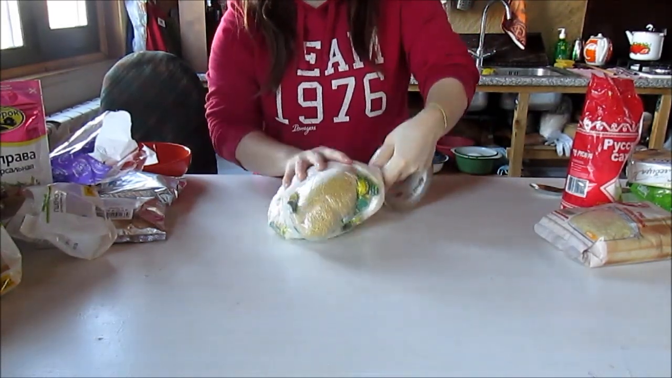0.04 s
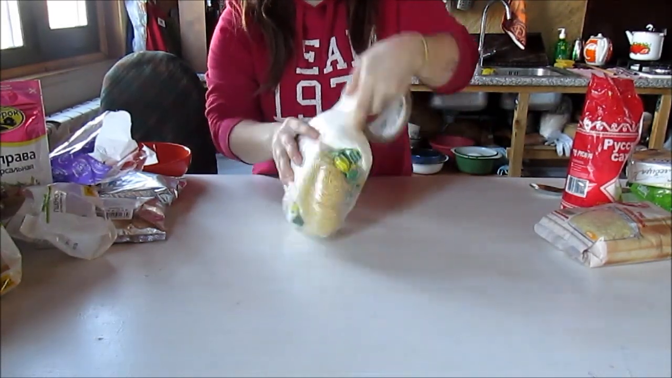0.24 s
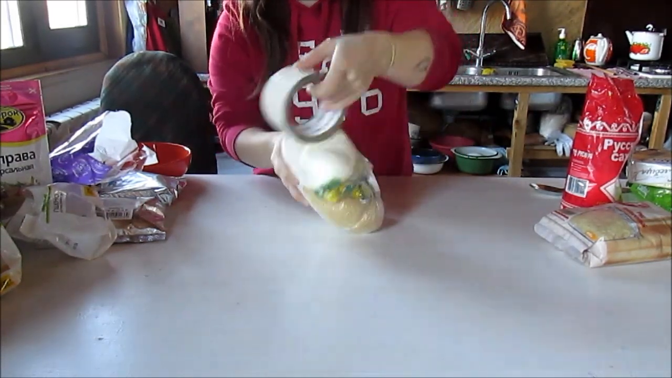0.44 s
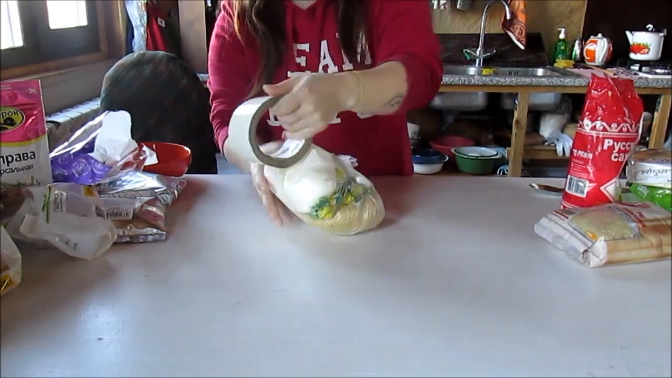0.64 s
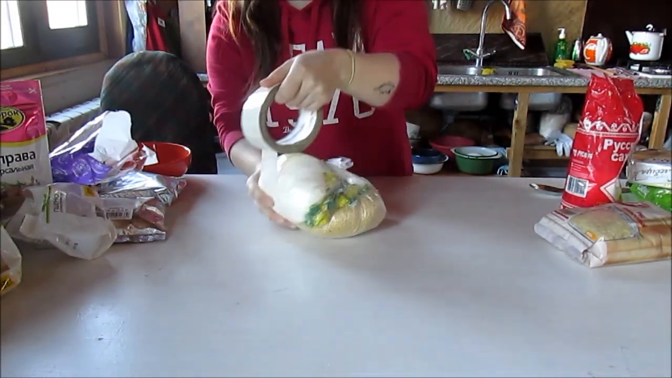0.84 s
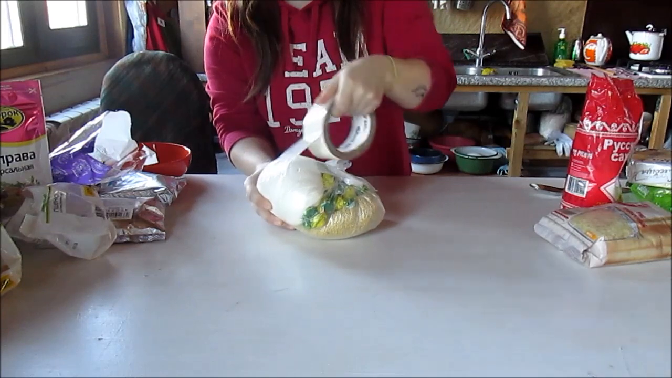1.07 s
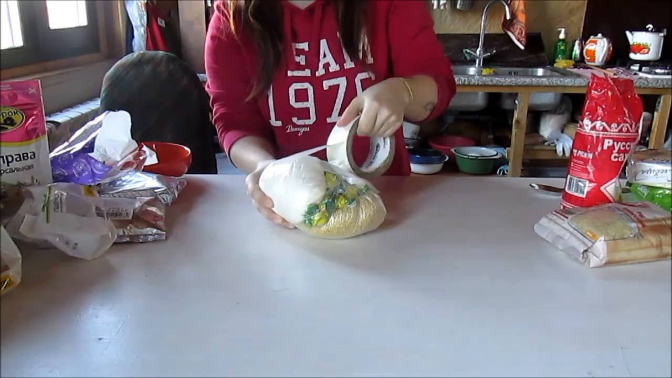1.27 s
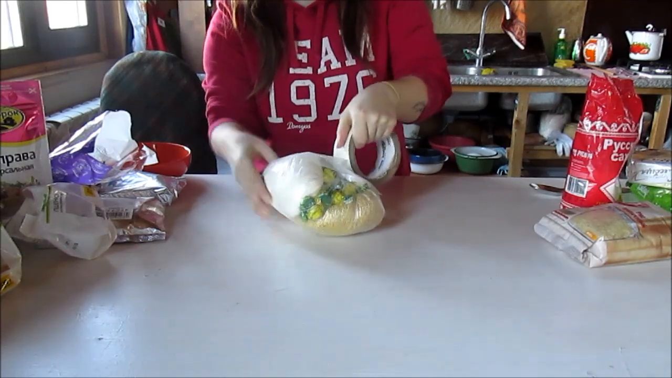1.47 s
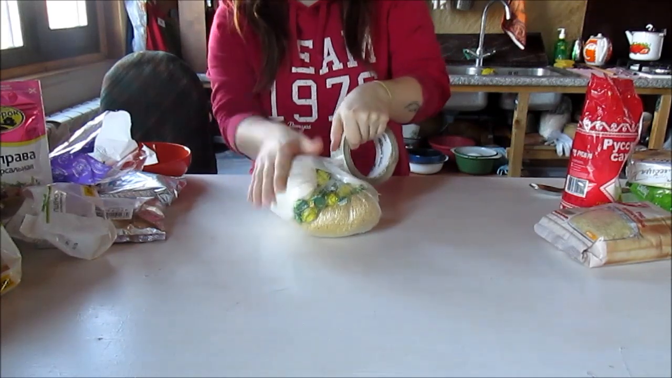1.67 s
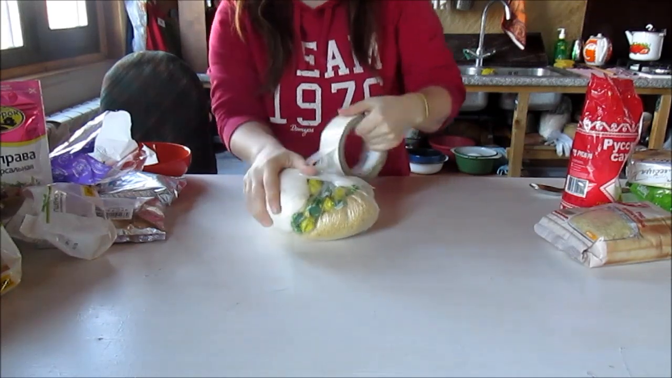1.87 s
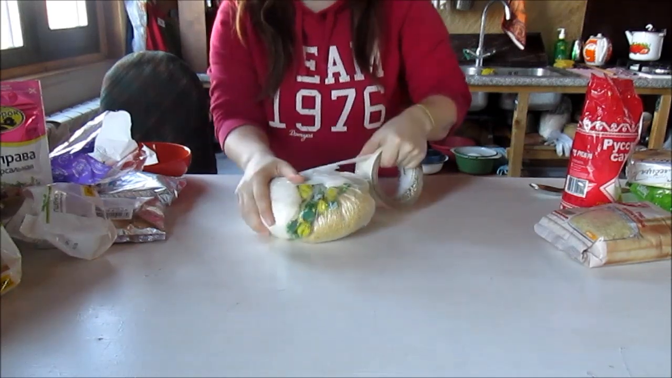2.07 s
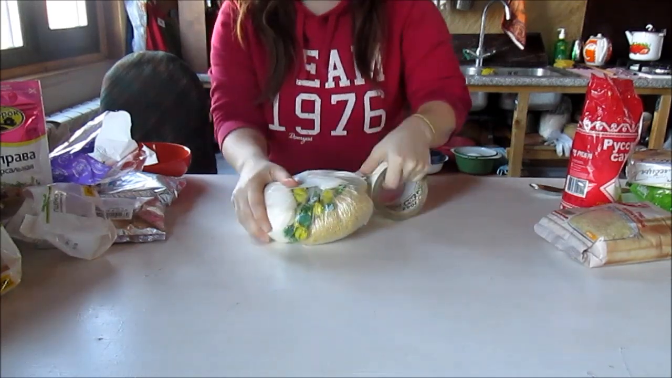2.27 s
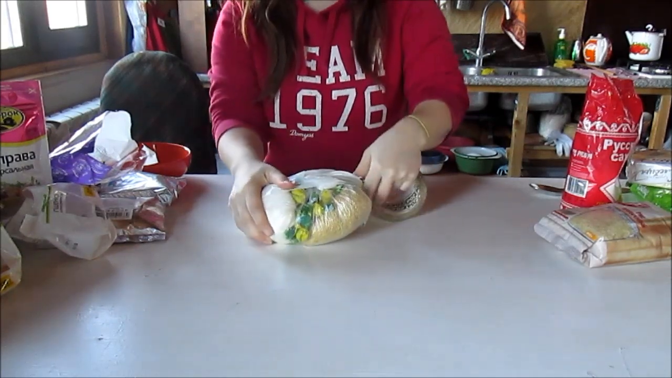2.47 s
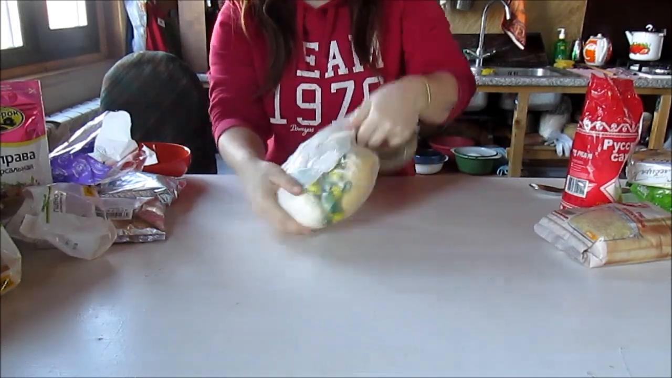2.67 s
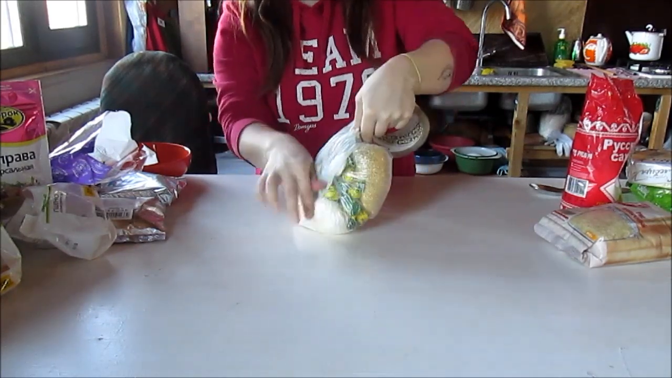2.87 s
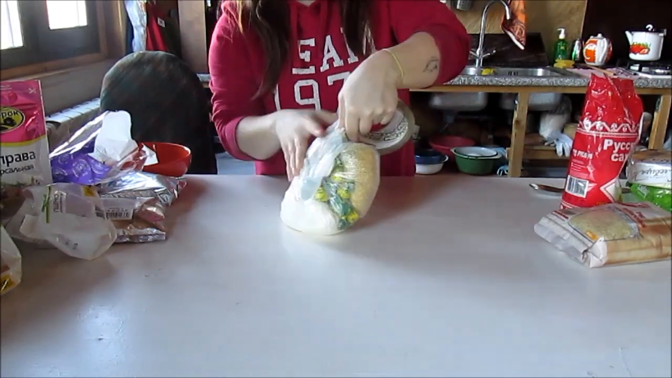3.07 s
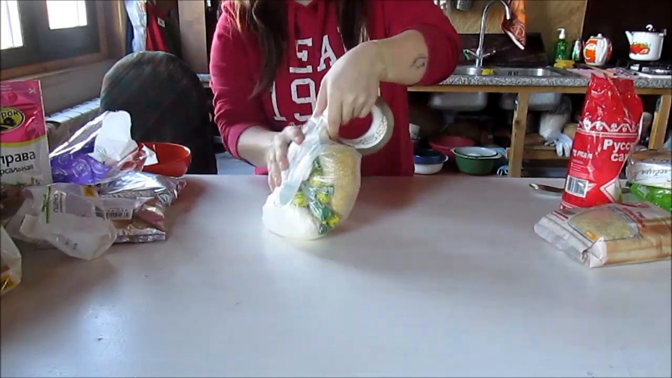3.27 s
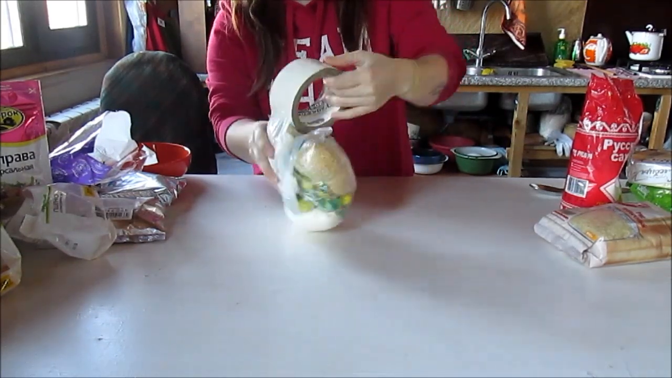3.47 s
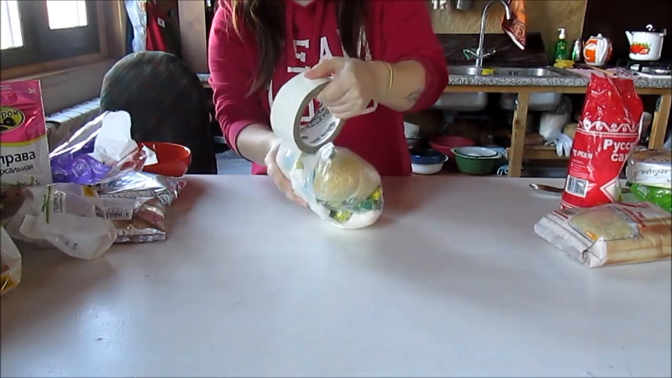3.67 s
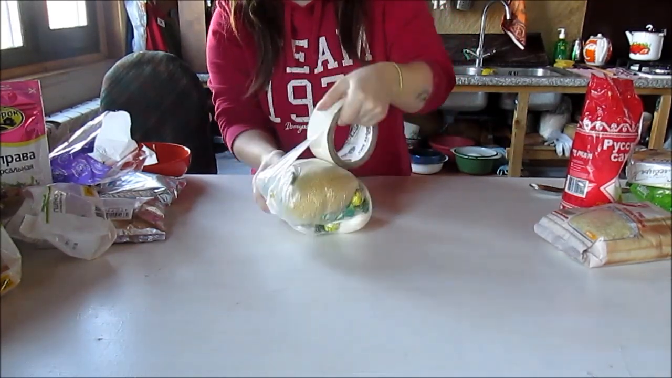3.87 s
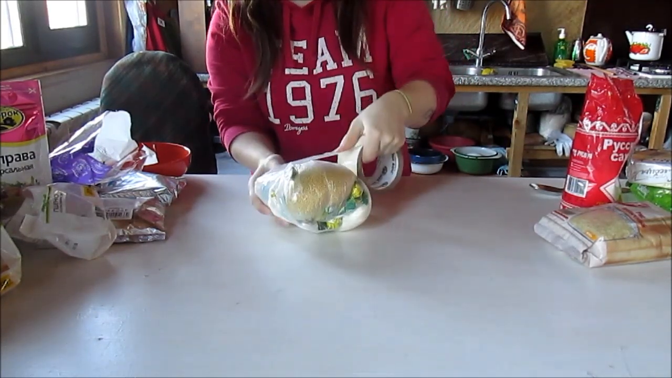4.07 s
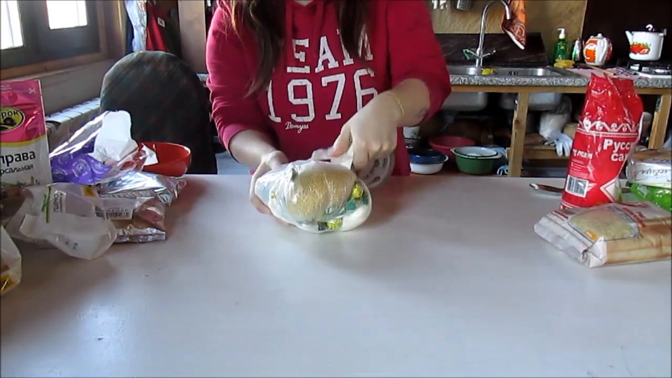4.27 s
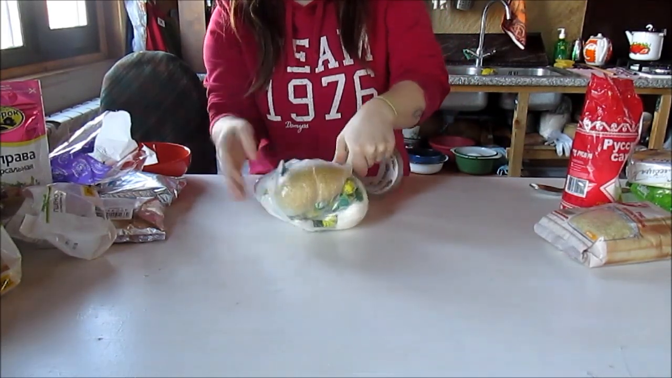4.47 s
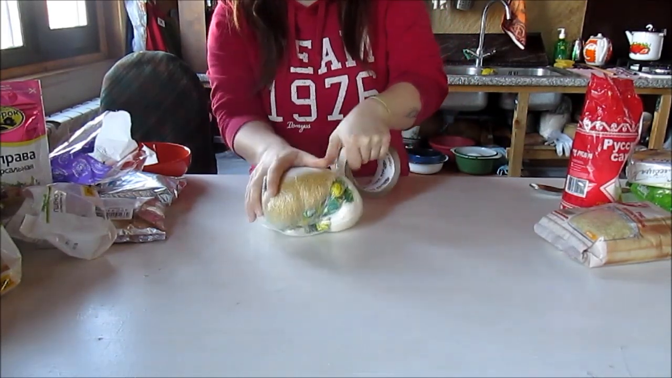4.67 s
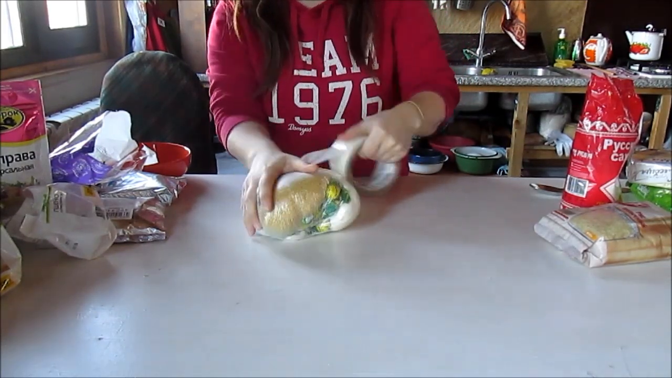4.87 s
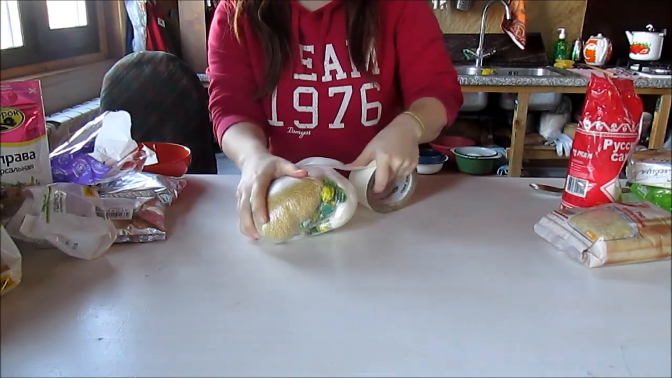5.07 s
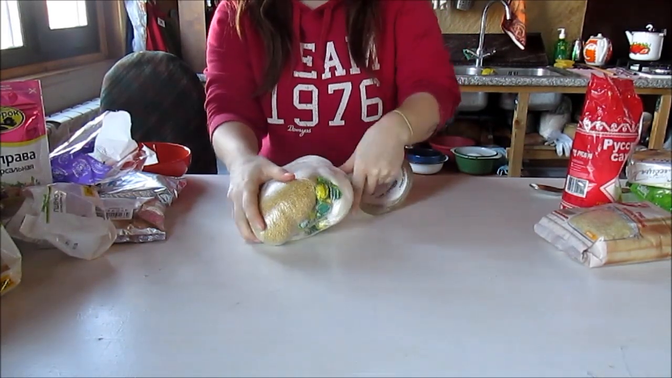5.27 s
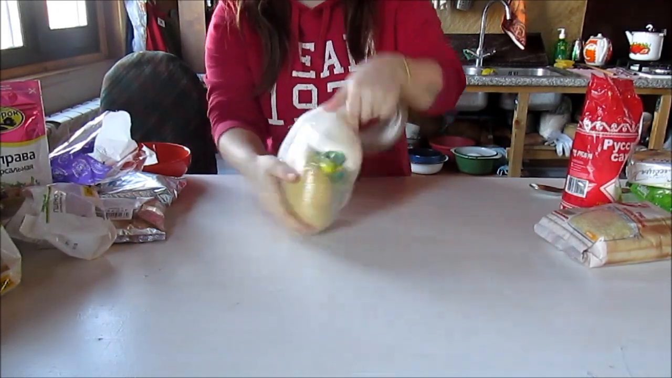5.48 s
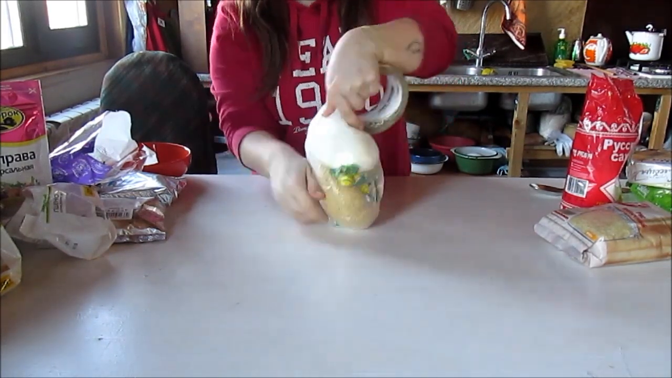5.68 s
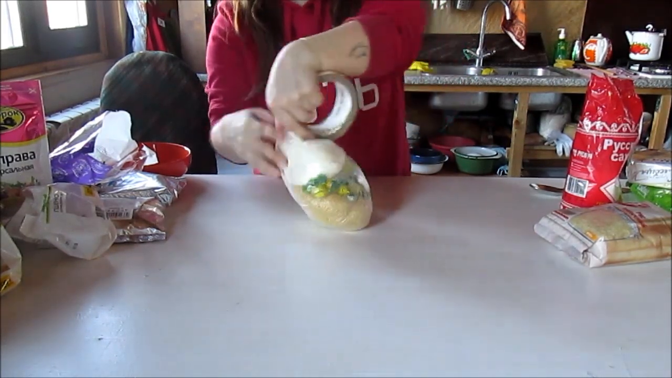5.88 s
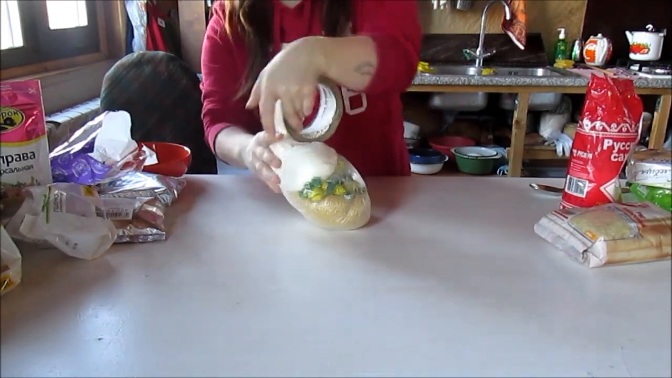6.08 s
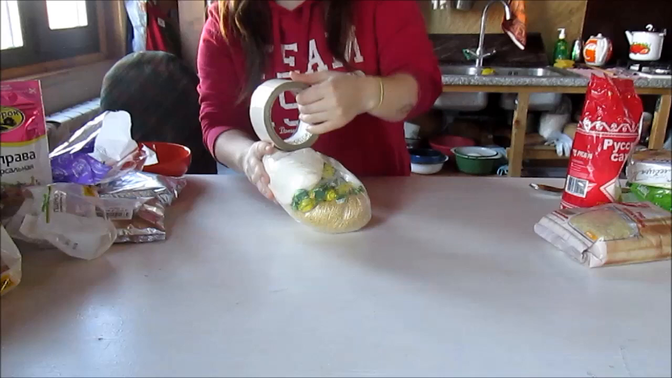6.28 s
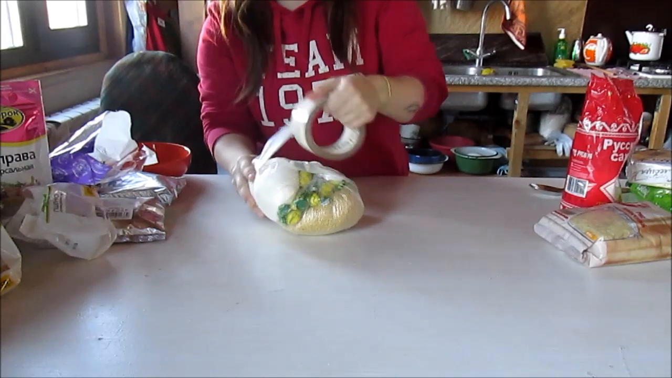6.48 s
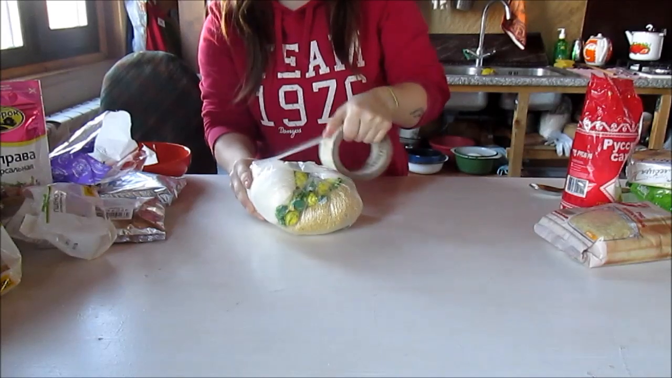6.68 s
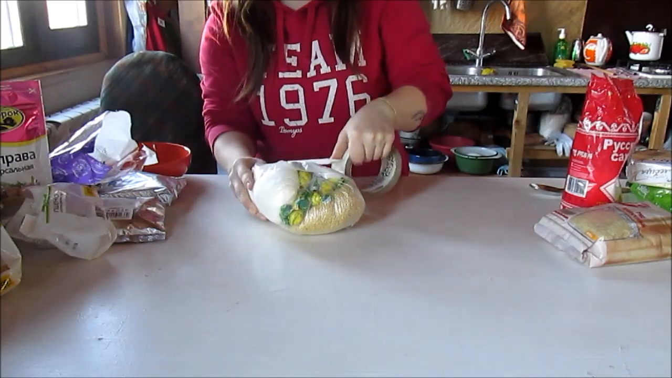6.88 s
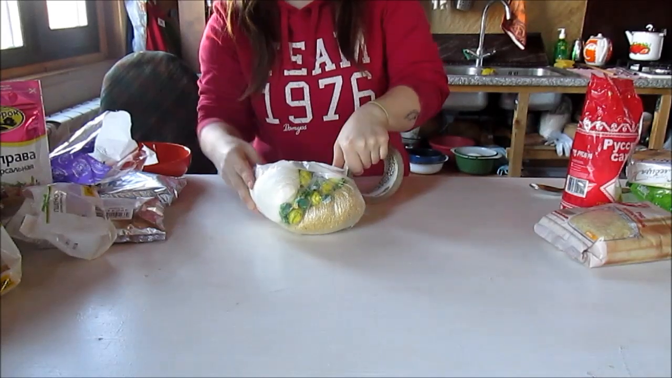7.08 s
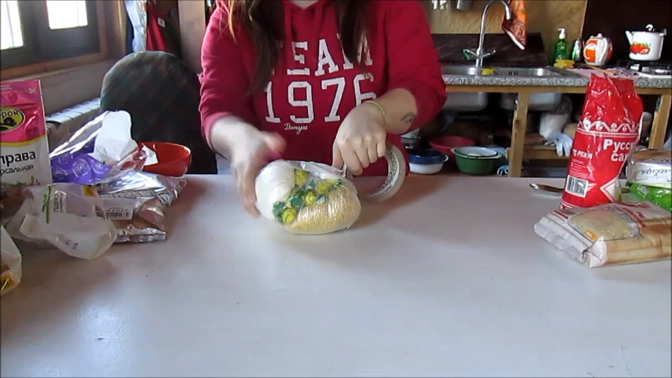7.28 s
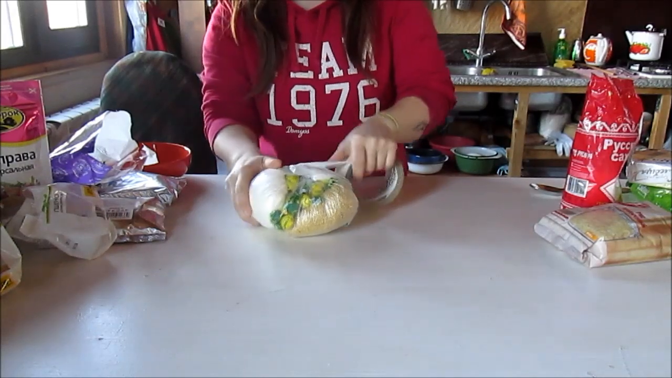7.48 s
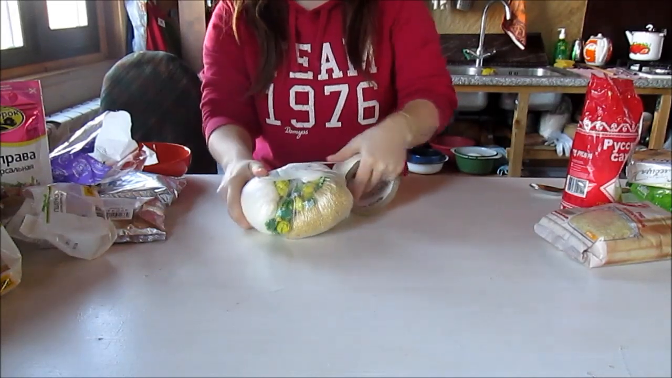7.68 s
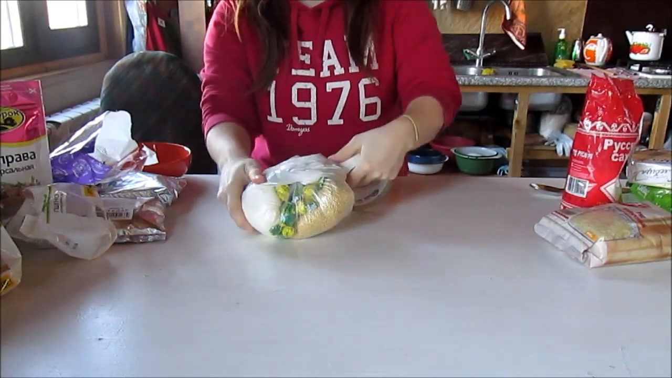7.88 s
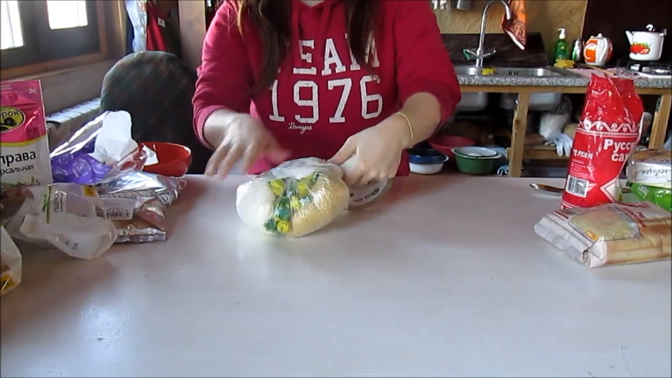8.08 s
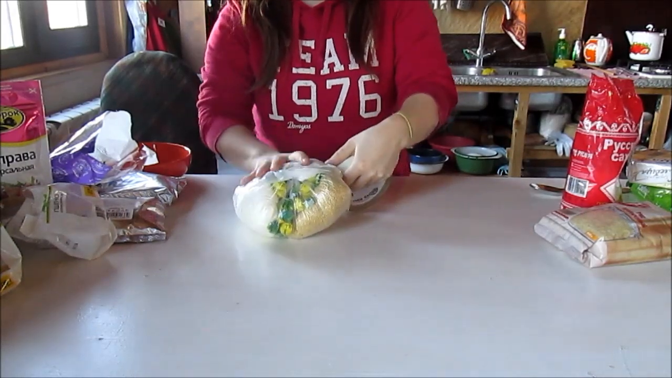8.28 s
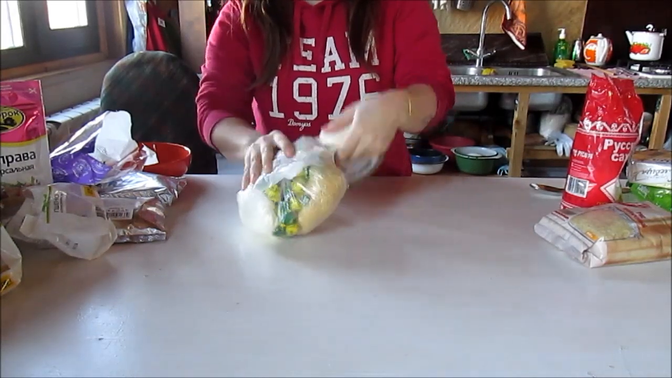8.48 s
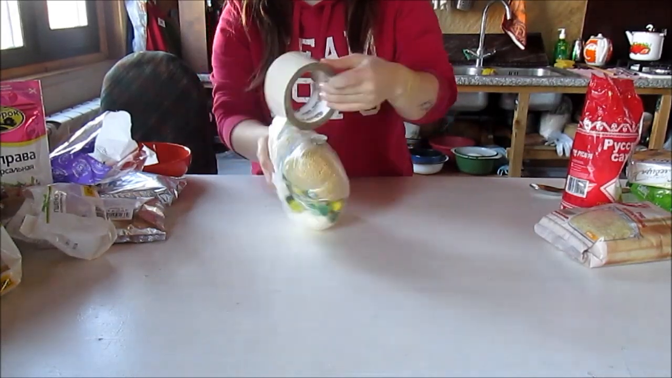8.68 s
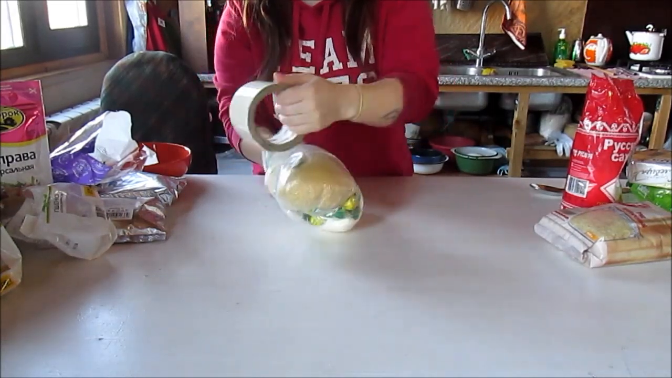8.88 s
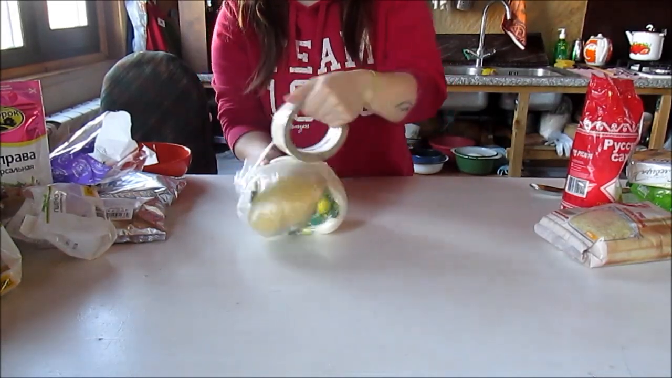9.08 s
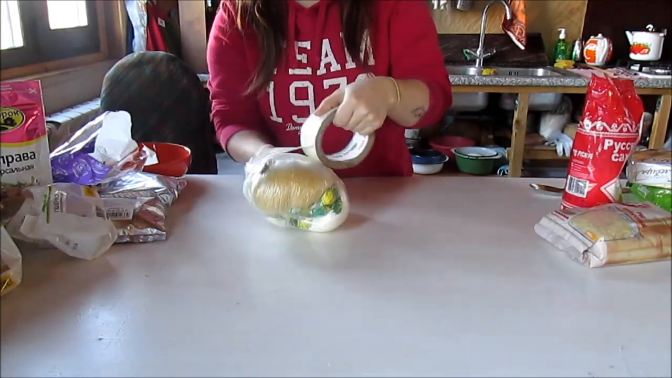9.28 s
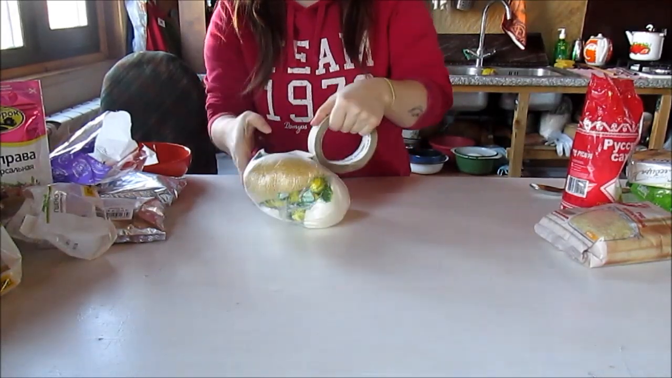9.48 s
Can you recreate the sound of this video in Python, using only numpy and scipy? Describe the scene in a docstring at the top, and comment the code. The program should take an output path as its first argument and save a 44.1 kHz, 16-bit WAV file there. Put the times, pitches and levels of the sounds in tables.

```python
"""Over a faint fridge hum a plastic bag crinkles, then sharp snaps ring out: packing tape leaves its roll
in jerks and is wound round a bag bundle on a kitchen table. The peel is stick-slip motion: lone slips under
slow tension are snaps, hundreds a second in a fast pull are a buzzing rasp. Each slip is a noise crack plus
the resonance of the plucked free strip. Bag, rubbing and fridge air are shaped noise, the hum is a sum of
sines, knocks and singing are decaying noise bands, and a small room adds echoes and a short tail."""
import sys
import numpy as np
from scipy import signal
from scipy.fft import rfft, irfft, next_fast_len
from scipy.io import wavfile
from scipy.ndimage import uniform_filter1d, minimum_filter1d

SR = 44100
rng = np.random.default_rng(int(sys.argv[2]) if len(sys.argv) > 2 else 0)


def unload_audio(sound):
    """Save the sound as a 16-bit wav file, at the path given as the first command line argument."""
    columns = np.transpose(np.atleast_2d(sound))
    # keep every value between -1 and 1, then stretch to whole-number steps
    steps = np.round(np.clip(columns, -1, 1) * 32767)
    wavfile.write(sys.argv[1], SR, steps.astype(np.int16))


N = 420782

# Partials of the fridge motor. Each row: frequency in Hz, mean level in dB.
HUM_PARTIALS = [(48.4, -86.5), (96.9, -69), (145.3, -66.5), (294, -76.5), (296.5, -67.5), (441.4, -78),
                (489.9, -71.5)]
# Spectrum of the still room air. Each row: frequency in Hz, relative level in dB.
AIR_SPECTRUM = [(20, -23), (33, -17), (55, -0.5), (130, -0.5), (220, -3), (400, -7), (900, -12.5),
                (3000, -18.5), (16000, -59)]
# Early reflections off roll, table and body. Each row: left delay in seconds, right delay in seconds, level in dB.
EARLY_ECHOES = [(.0011, 0.0014, -27), (.00312, 0.00306, -12), (.00785, 0.0063, -13.5),
                (0.0107, .0119, -17.5)]
# Reverberation of the room. Each row: frequency in Hz, time to decay by 60 dB in seconds.
ROOM_DECAY = [(150, 0.502), (600, 0.407), (1300, 0.454), (2000, 0.4575), (3100, 0.4225), (6000, 0.318),
              (14000, 0.1833)]
# Low resonances of table and room. Each row: frequency in Hz, level in dB, time to decay by 60 dB in seconds.
LOW_MODES = [(332.7, -56, 0.22), (368.8, -63.5, 0.29), (587.6, -57.5, 0.3)]
# Knocks of bundle and roll on the table. Each row: start in seconds, relative level in dB, centre pitch in Hz.
TABLE_KNOCKS = [(.512, -35.5, 568.7), (1.454, -46, 169.6), (2.405, -41.5, 140.2), (4.378, -43.5, 380),
                (6.935, -38.5, 124.4)]
# Grips and turns of the bundle. Each row: start in seconds, length in seconds, relative level of the bag's
# crinkle in dB, relative level of the rubbing in dB.
HAND_MOVES = [(0.024, 0.306, -44, -51), (0.367, 0.0486, -41, -47.5), (0.51, 0.254, -45, -55),
              (1.434, 0.099, -49, -55), (1.714, 0.24, -48, -54), (2.252, 0.247, -46.5, -61.5),
              (2.555, 0.3796, -41.5, -51), (3.084, .1, -50.5, -57.5), (3.215, 0.111, -41, -51),
              (3.404, 0.26, -46.5, -56), (4.328, 0.098, -44.5, -51), (4.626, 0.2496, -42, -49.5),
              (5.321, 0.387, -46, -54), (5.639, 0.1964, -43.5, -56.5), (5.986, 0.0438, -47.5, -57),
              (6.118, 0.29, -50, -62.5), (6.703, 0.309, -45, -52), (7.381, 0.2497, -44.5, -55),
              (7.751, 0.181, -52.5, -65), (7.982, 0.046, -47.5, -53.5), (8.279, 0.165, -46, -53),
              (8.679, 0.2244, -49.5, -60), (9.389, 0.067, -43, -46)]
# Spectrum of the bag's ticks. Each row: frequency in Hz, relative level in dB.
CRINKLE_SPECTRUM = [(300, -3.5), (1000, -39.5), (2200, -15.5), (3200, -5.5), (6000, 0.5), (8700, 0.5),
                    (11000, -2.5), (16000, 0)]
# Spectrum of the rubbing. Each row: frequency in Hz, relative level in dB.
RUB_SPECTRUM = [(100, -29), (350, 1), (600, 6.5), (1300, 4.5), (2500, 1), (6000, -0.5), (16000, -14)]
# The loudest creases popping in the bag. Each row: start in seconds, relative level in dB.
CREASE_POPS = [(1.697, -26), (1.797, -24), (2.839, -23.5), (2.89, -22.5), (3.209, -28), (3.219, -26.5),
               (3.229, -27), (3.291, -24.5), (3.622, -30), (5.323, -25.5), (5.359, -27.5), (5.785, -27.5),
               (5.994, -24.5), (6.048, -26.5), (6.889, -26.5), (7.41, -23.5), (8.447, -31), (9.356, -28),
               (9.423, -29)]
# Spectrum of a crease. Each row: frequency in Hz, relative level in dB.
CREASE_SPECTRUM = [(200, -11), (700, -17.5), (3000, -5.5), (8000, 0.5), (16000, -8.5)]
# Brief singing of the stretched tape. Each row: start in seconds, level in dB, pitch in Hz, decay in seconds.
STRIP_SINGING = [(1.135, -30.5, 352, 0.0275), (4.94, -37, 3157, 0.06), (5.502, -39.5, 1124, 0.0686),
                 (7.52, -36.5, 1312, 0.03945), (9.399, -41, 2622, 0.034)]
# Spectrum of a slip's crack. Each row: frequency in Hz, relative level in dB.
CRACK_SPECTRUM = [(30, -50.5), (120, -45.5), (400, -15.5), (650, -8.5), (1100, -2), (2000, -4.5),
                  (2600, -3), (3300, 0.5), (4200, -2), (5800, 1), (8700, -1), (10500, -5.5), (13500, -2),
                  (16000, -14)]
# Lone slips of the tape, and the faint click of a knock at 1.452 s. Each row: start in seconds, relative level
# over one millisecond in dB, brightness in dB per octave (limited in use), relative level of the ring in dB.
SNAP_CLICKS = [(.1158, -16.5, 3, -29), (.138, -20.5, 1, -10.5), (0.1576, -7, -1.5, -31),
               (.1666, -16.5, -0.5, -30), (0.1755, -7, 2.5, -29), (.2143, -10.5, 1.5, -22),
               (0.229, -14.5, 0, -25), (1.0844, -16.5, 4, -21), (1.452, -32, -5.5, -9),
               (2.0114, -8, -2, -2), (2.0177, -3, 7, -7.5), (2.6828, -10, 2, -15.5), (3.433, -17, 2, -6),
               (3.4493, -11, -2, -43.5), (3.4745, -9.5, -2.5, -18.5), (3.667, -9, -3.5, -33),
               (3.6787, -21, 5.5, 11), (4.0401, -7.5, 7, -14.5), (4.2195, -6.5, 7, -31.5),
               (4.2344, -7.5, 7, -27.5), (4.3761, -20, 3, -9.5), (4.694, -12, 5, -8.5),
               (4.724, -8.5, 0.5, -4), (4.7507, -12, 0.5, -8.5), (5.4567, -15, 3, -17.5),
               (5.4624, -19.5, -0.5, -16.5), (5.4959, -9, 2.5, -10), (5.5099, -14, 2, -21),
               (6.6488, -12.5, -3.5, 1), (6.6714, -7.5, 2.5, 2), (6.7447, -17, 2.5, -14.5),
               (6.7816, -17.5, 7, -10.5), (6.7885, -6.5, 7, -17.5), (6.935, -6, 7, -18.5),
               (7.4526, -8.5, 4, -22.5), (7.474, -5, 3.5, -12), (8.4631, -6.5, 5, -11),
               (8.8695, -15, 0, -4.5)]
# Pulls of the tape. Each row: start in seconds, length in seconds, level in dB, swell from start to end in dB,
# nominal slips per second at full speed in Hz, strip pitch at the start in Hz, strip pitch at the end in Hz,
# relative strip ring in dB, hollow in the low treble in dB (negative is a dip), brightness in dB per octave.
TAPE_PULLS = [(.763, 0.01776, -20, -2.5, 474.6, 756, 720, -13.5, -7.5, 4),
              (0.788, 0.0938, -18.5, 4.5, 879.7, 697.5, 570, -2, -6, 0.5),
              (.957, 0.0697, -19.5, 4, 681.5, 720, 540, -5, -3, -0.5),
              (1.083, 0.049, -20, 6, 481.3, 546, 340, -3, -4.5, -4),
              (1.847, 0.02214, -28, 4, 425.6, 497, 430, -6, 1.5, 3),
              (1.888, 0.0314, -22.5, 2, 560.3, 480, 400, -6, -1, 0),
              (1.929, 0.0718, -16.5, 8.5, 429.9, 530.6, 424.5, -6.5, 1, -0.5),
              (2.641, .036, -23.5, 5.5, 240.6, 680, 600, -14, -3, 2.5),
              (3.728, 0.06944, -17.5, 0, 560.3, 660.8, 589.9, 0.5, -2, -1.5),
              (3.8, .084, -20.5, -5.5, 849.2, 620.5, 337, -12.5, 0, -1.5),
              (3.944, 0.0881, -20.5, 2, 520.6, 379.6, 280, -11, 0.5, -1),
              (4.211, 0.0221, -24.5, -4.5, 330.3, 677.2, 620.1, -15.5, 1, 5.5),
              (4.679, 0.0543, -21.5, 13, 260.2, 700.2, 620, -10.5, 2.5, 1.5),
              (4.885, 0.0194, -14.5, -2, 597.6, 700, 640, -15, -1.5, 0),
              (4.908, .058, -21, -1, 300.6, 640.9, 560, -17, 3.5, 1.5),
              (6.281, .02, -30.5, 1.5, 221.8, 680, 640, -30, -2.5, 3),
              (6.345, 0.1511, -19, 6, 759, 842.7, 410, 0.5, 2.5, 1.5),
              (6.548, 0.02256, -21, 2.5, 578.7, 379.4, 311, 0, 4.5, 0),
              (6.647, 0.04077, -21, 10, 379.4, 402, 297, -2.5, 5, 0),
              (7.486, 0.0486, -19, 2.5, 280.2, 680, 620, -15.5, -2.5, 1.5),
              (8.956, 0.16345, -19, -3, 851.9, 679.5, 349.8, -6.5, 1, .5)]

LEFT_DB = 1.3  # level of left over right
TOP_HZ = 16100  # upper limit of the sound
GRAIN = 1024  # samples in one slip or crease
GRIP_ATTACK_S, GRIP_RELEASE_S = 0.0462, 0.0549  # the bag yields quickly and settles more slowly
HELD_DB = -56  # relative crinkle of the bag while it is only held
LARGEST_TICK = 4.5  # cap on the random size of a tick
RUB_WAVER_DB = 3.5
SING_WIDTH = .18  # bandwidth as a share of the pitch
CRACK_S, RASP_S = .0007, .0011  # decay of the tearing burst in single snaps and in pulls
SPREAD_S = .0008  # delay of the bending wave at 1 kHz
STRIP_Q, OVERTONE_DB = 5, -6  # strip resonance during pulls
RING_MAX_DB = 4  # cap on the strip ring relative to the crack
RING_SPEED_DB = 4  # strip ring gained per doubling of speed
RING_SLACK_DB = 3.5  # strip ring lost per octave that its pitch sinks
EDGE_SPEED = .6  # speed at the start and end of a pull, as a share of full speed
SPEED_DB = 4  # level gained per doubling of speed
UNEVEN, UNEVEN_HZ, UNEVEN_POWER = .3, 403, .4  # unevenness at that slip rate; it falls with rate by this power
HOLLOW_FILL_DB_PER_S = 56  # the hollow fills in as the roll swings away from the bundle
FLAP_DB, FLAP_SLOPE_DB = -9, -24  # most flapping, up to UNEVEN_HZ, and its change per doubling of rate above
PATCHY_DB, PATCH_HZ = 1.5, 70.14  # the glue holds unevenly: level wander in a pull and its rate of change


def undb(db):
    """Decibels express the logarithm of an amplitude ratio; this recovers the ratio."""
    return 10 ** (np.asarray(db) / 20)


def unit(x):
    """Division by the root mean square normalises a signal to rms 1."""
    return x / np.sqrt(np.mean(x ** 2))


def along(points, hz):
    """Linear interpolation of (Hz, value) points on a logarithmic frequency axis."""
    f, value = np.transpose(points)
    return np.interp(np.log(np.maximum(hz, 1)), np.log(f), value)


def colour(x, points):
    """Linear filtering multiplies the spectrum by a gain given as (Hz, dB) points."""
    size = next_fast_len(N)
    gain = undb(along(points, np.fft.rfftfreq(size, 1 / SR)))
    return irfft(rfft(x, size) * gain, size)[..., :N]


def walk(rate):
    """Slow random modulation: normal values, rate per second, joined by lines; spread near 1."""
    count = int(N / SR * rate) + 2
    return 1.238 * np.interp(np.arange(N) / SR * rate, np.arange(count), rng.standard_normal(count))


def add(out, start, sound):
    """Superposition: a sound is summed into the signal from a given sample on."""
    start = max(start, 0)
    part = out[..., start:start + sound.shape[-1]]
    part += sound[..., :part.shape[-1]]


def ringing(hz, width, decay_s, rise_s):
    """A cluster of close modes, modelled as band-limited noise, swells and decays exponentially."""
    t = np.arange(SR // 2) / SR
    f = np.fft.rfftfreq(len(t), 1 / SR)
    band = irfft(rfft(rng.standard_normal(len(t))) / (1 + ((f / hz - 1) / width) ** 2))
    return unit(band) * np.exp(-t / decay_s) * np.minimum(t / rise_s, 1)


def fridge(air_db=-63, waver_db=2, drift_hz=0.7916):
    """Additive synthesis: motor partials waver in level and frequency over the broadband air noise."""
    t = np.arange(N) / SR
    hum = 0
    for hz, db in HUM_PARTIALS:
        level = undb(db + waver_db * walk(2.9))
        cycles = hz * t + drift_hz * np.cumsum(walk(6)) / SR
        hum = hum + level * np.sin(2 * np.pi * cycles)
    # a weak part common to both channels and a strong independent part
    air = colour(rng.standard_normal(N) + 4.0 * rng.standard_normal((2, N)), AIR_SPECTRUM)
    return np.sqrt(2) * hum + undb(air_db) * unit(air)


def kitchen(x, room_db=-9, build_s=0.01164, alike_hz=900, lag_s=.000012):
    """Room impulse response: direct sound, near echoes, low modes and a diffuse tail, its bass alike in both ears."""
    size = 32768
    t, hz = np.arange(size) / SR, np.fft.rfftfreq(size, 1 / SR)
    common, own = rfft(rng.standard_normal(size)), rfft(rng.standard_normal((2, size)))
    share = 1 / (1 + (hz / alike_hz) ** 2)
    diffuse = np.sqrt(share) * common + np.sqrt(1 - share) * own
    centres, decays = np.transpose(ROOM_DECAY)
    tail = 0
    for weights, t60 in zip(np.eye(len(centres)), decays):
        band = along(np.column_stack([centres, weights]), hz)
        tail = tail + irfft(diffuse * band) * np.exp(-np.log(1000) * t / t60)
    response = unit(tail * (1 - np.exp(-t / build_s))) * undb(room_db) / np.sqrt(size)
    for left_s, right_s, db in EARLY_ECHOES:
        response[[0, 1], [int(left_s * SR), int(right_s * SR)]] += undb(db)
    for mode_hz, db, t60 in LOW_MODES:
        response += undb(db) * np.sin(2 * np.pi * mode_hz * t) * np.exp(-np.log(1000) * t / t60)
    # the work is slightly nearer the left: a linear phase delays the right channel
    lag_size = 2 ** 19
    lag = np.exp(-2j * np.pi * lag_s * np.fft.rfftfreq(lag_size, 1 / SR))
    direct = np.array([x[0], irfft(rfft(x[1], lag_size) * lag)[:N]])
    return direct + signal.fftconvolve(x, response, axes=-1)[:, :N]


def knocks(decay_s=0.0062, width=0.25):
    """Impacts on the table top excite broad, heavily damped resonances."""
    out = np.zeros(N)
    for s, db, hz in TABLE_KNOCKS:
        add(out, int(s * SR), undb(db) * ringing(hz, width, decay_s, 0.0011))
    return out


def grip(start, length):
    """Envelope of one hand move: linear attack ending at the start, hold, exponential release."""
    t = np.arange(N) / SR - start
    return np.clip(1 + t / GRIP_ATTACK_S, 0, 1) * np.exp(-np.maximum(t - length, 0) / GRIP_RELEASE_S)


def bag(crinkle_db=-1, rub_db=-1, per_second=1100, scatter_db=4, tick_s=0.0015):
    """Buckling of thin film releases random ticks of all sizes while friction of hands and bundle adds noise."""
    crinkling, rubbing = undb(HELD_DB), 0
    for start, length, bag_db, hand_db in HAND_MOVES:
        move = grip(start, length)
        crinkling = np.maximum(crinkling, undb(bag_db) * move)
        rubbing = np.maximum(rubbing, undb(hand_db) * move)
    sizes = np.minimum(rng.exponential(size=N), LARGEST_TICK)
    ticks = (rng.random(N) < per_second / SR) * undb(scatter_db * sizes)
    # the energies of overlapping ticks add
    energy = signal.lfilter([1], [1, -np.exp(-2 / (tick_s * SR))], ticks ** 2)
    grit = np.sqrt(energy + 1e-9) * (rng.standard_normal(N) + 1.2 * rng.standard_normal((2, N)))
    rub = rng.standard_normal(N) * undb(RUB_WAVER_DB * walk(70))
    crinkle = unit(colour(grit, CRINKLE_SPECTRUM)) * crinkling * undb(crinkle_db)
    return crinkle + unit(colour(rub, RUB_SPECTRUM)) * rubbing * undb(rub_db)


def creases(pop_s=0.00153, pop_db=-1):
    """Snap-through of larger folds, one at a time, gives exponentially decaying noise bursts."""
    out, t = np.zeros(N), np.arange(GRAIN) / SR
    for s, db in CREASE_POPS:
        add(out, int(s * SR), undb(db + pop_db) * rng.standard_normal(GRAIN) * np.exp(-t / pop_s))
    return colour(out, CREASE_SPECTRUM)


def singing(width=SING_WIDTH):
    """Free vibration of the taut strip fades by damping."""
    out = np.zeros(N)
    for s, db, hz, decay_s in STRIP_SINGING:
        add(out, int(s * SR), undb(db) * ringing(hz, width, decay_s, 0.005384))
    return out


def hollow(hz, hollow_hz=2400, width=0.439, edge=0.55):
    """Interference: an echo off the roll cancels the direct sound at one pitch, reinforces it an octave higher."""
    octaves = np.log2(hz / hollow_hz)
    return np.exp(-.5 * (octaves / width) ** 2) - edge * np.exp(-.5 * ((octaves - 1) / width) ** 2)


def even(spectrum):
    """Normalisation of each grain's spectrum to unit mean energy."""
    return spectrum / np.sqrt(np.mean(np.abs(spectrum) ** 2, axis=-1, keepdims=True))


def mode(hz, centre, q):
    """A damped resonance that radiates little below its pitch."""
    s = 1j * hz / centre
    return s / (s * s + s / q + 1) * s * s / (s * s + s + 1)


def slips(rows, alike, crack_s, ring_db, ring_q, overtone_db, flap_db,
          apart=0.423, overtone=1.598, ring_alike=0.692):
    """Stick-slip release: a row (s, dB, brightness, hollow dB, strip Hz, ring dB) is a crack plus the plucked strip."""
    when, db, bright, hollow_db, strip_hz, pluck_db = (c[:, None] for c in np.transpose(rows))
    t, hz = np.arange(GRAIN) / SR, np.fft.rfftfreq(GRAIN, 1 / SR) + 1

    # bending waves in the film bring the highs first; the tearing glue adds a burst that is new each time
    chirp = np.exp(-4j * np.pi * SPREAD_S * np.sqrt(hz * 1000))
    noise = rng.standard_normal(size=(len(rows), 3, GRAIN))
    tear = even(rfft(noise * np.exp(-t / crack_s))).transpose(1, 0, 2)
    burst = np.sqrt(1 - apart) * tear[0] + np.sqrt(apart) * tear[1:]  # partly independent left and right
    tilt_db = np.clip(bright, -6, 7) * np.log2(np.maximum(hz, 2000))  # acts above 2 kHz
    shape = even(undb(along(CRACK_SPECTRUM, hz) + hollow_db * hollow(hz) + tilt_db))
    crack = shape * (np.sqrt(alike) * chirp + np.sqrt(1 - alike) * burst)

    # the free strip rings at a pitch set by its length and tension, and flaps below it when the peel is slow
    strip_hz = strip_hz * np.exp(0.0936 * rng.standard_normal(strip_hz.shape))
    ring = even(mode(hz, strip_hz, ring_q))
    ring = ring + undb(overtone_db) * even(mode(hz, overtone * strip_hz, ring_q))
    ring = ring + undb(flap_db) * even(mode(hz, 160, 0.34))
    ring = even(ring / (1 + (hz / 1500) ** 4))
    ring = ring * (np.sqrt(ring_alike) + np.sqrt(1 - ring_alike) * tear[0])
    ring_gain = undb(np.minimum(pluck_db + ring_db, RING_MAX_DB))

    # a linear phase places each grain between samples
    start, fraction = np.divmod(when * SR, 1)
    lead = 16
    delay = np.exp(-2j * np.pi * hz * (fraction + lead) / SR)
    grains = irfft((crack + ring_gain * ring) * undb(db) * delay)
    out = np.zeros((2, N))
    for k in range(len(rows)):
        add(out, int(start[k, 0]) - lead, grains[:, k])
    return out * np.sqrt(SR / 1000)  # levels refer to one millisecond


def snaps(snap_db=1, strip_hz=680):
    """Isolated slips occur as the tape is slowly drawn taut; a knock's faint click is modelled the same way."""
    rows = [(s, db + snap_db, bright, 0, strip_hz, ring_db) for s, db, bright, ring_db in SNAP_CLICKS]
    return slips(rows, alike=0.456, crack_s=CRACK_S, ring_db=-9, ring_q=2.76, overtone_db=-7.0, flap_db=-12.5)


def pulls(scatter_db=6, jitter=.8, ring_db=-5.0):
    """Faster peeling slips more often, louder and more evenly; the strip's pitch sinks as it lengthens."""
    rows, flaps = [], []
    glue_db = PATCHY_DB * walk(PATCH_HZ)
    for start, length, level_db, swell_db, top_hz, first_hz, last_hz, pluck_db, hollow_db, bright in TAPE_PULLS:
        t = 0
        for gap, size in rng.standard_normal((400, 2)):  # at most 400 slips in a pull
            if t > length:
                break
            progress = t / length
            # the hand speeds up and slows down
            speed = EDGE_SPEED + (1 - EDGE_SPEED) * np.sin(np.pi * progress)
            rate = top_hz * speed
            uneven = min(UNEVEN * (UNEVEN_HZ / rate) ** UNEVEN_POWER, .5)
            db = level_db + SPEED_DB * np.log2(speed) + swell_db * (progress - .5)
            db += glue_db[int((start + t) * SR)]
            # the slower the slips, the more of the level each one carries
            share_db = -10 * np.log10(rate / 1000)
            slip_db = db + share_db + scatter_db * uneven * size
            strip_hz = first_hz * (last_hz / first_hz) ** (progress ** 2)
            plucked_db = pluck_db + RING_SPEED_DB * np.log2(speed) + RING_SLACK_DB * np.log2(strip_hz / first_hz)
            filled_db = hollow_db + HOLLOW_FILL_DB_PER_S * (t - length / 2)
            rows.append((start + t, slip_db, bright, filled_db, strip_hz, plucked_db))
            flaps.append([min(FLAP_DB + FLAP_SLOPE_DB * np.log2(rate / UNEVEN_HZ), FLAP_DB)])
            t += np.exp(jitter * uneven * gap) / rate
    return slips(rows, alike=0.0452, crack_s=RASP_S, ring_db=ring_db, ring_q=STRIP_Q,
                 overtone_db=OVERTONE_DB, flap_db=np.array(flaps))


def scene():
    """Superposition of tape, bag and table in the kitchen, a little left of centre, over the fridge."""
    work = knocks() + bag() + creases() + singing() + snaps() + pulls()
    balance = undb(np.array([[LEFT_DB], [-LEFT_DB]]) / 2)
    return kitchen(work) * balance + fridge()


def record(dry, knee=0.5495):
    """Peak limiting by a smoothed gain rounds the sharpest peaks; an elliptic low-pass removes the top."""
    size = 48  # samples over which the gain is held and smoothed
    peak = np.abs(dry).max(axis=0) + 1e-9
    gain = np.minimum(1, knee / peak) ** .7
    limited = dry * uniform_filter1d(minimum_filter1d(gain, size), size)
    return signal.sosfilt(signal.ellip(10, .2, 70, TOP_HZ, fs=SR, output="sos"), limited)


dry = scene()
out = record(dry)
unload_audio(out)
```